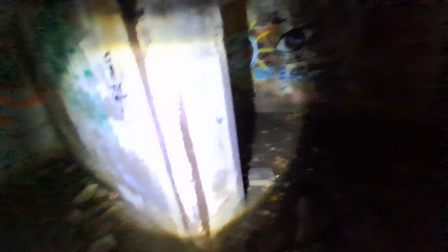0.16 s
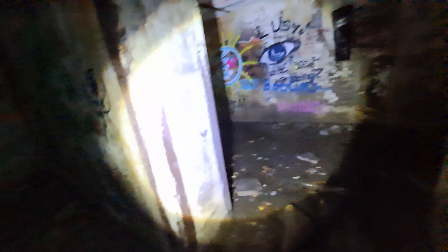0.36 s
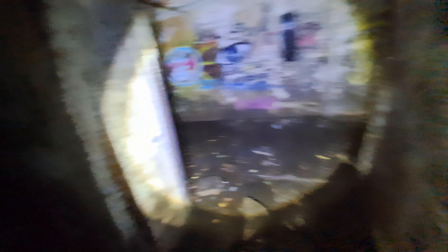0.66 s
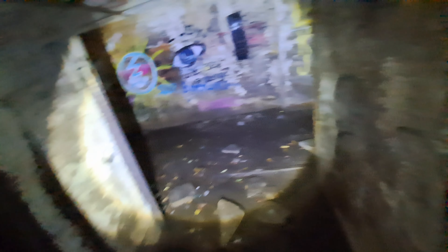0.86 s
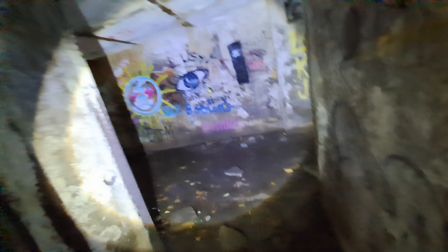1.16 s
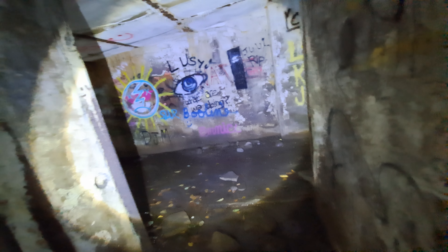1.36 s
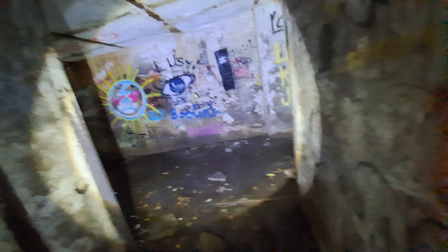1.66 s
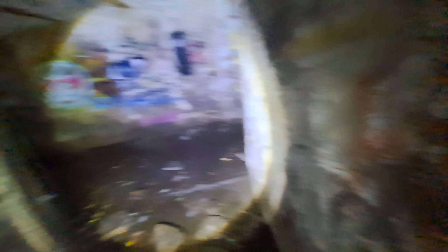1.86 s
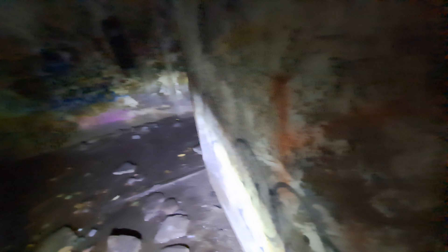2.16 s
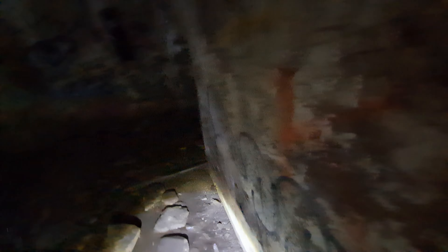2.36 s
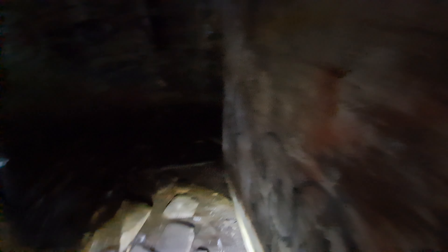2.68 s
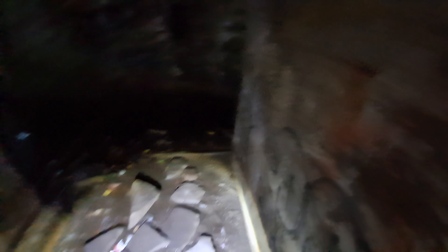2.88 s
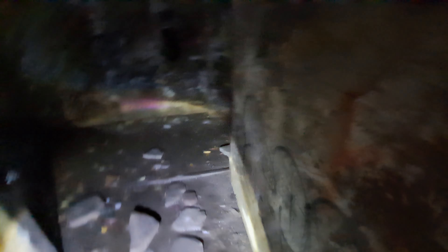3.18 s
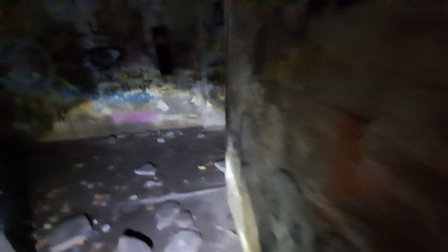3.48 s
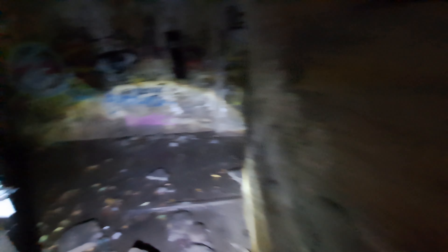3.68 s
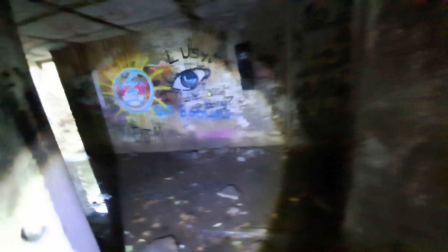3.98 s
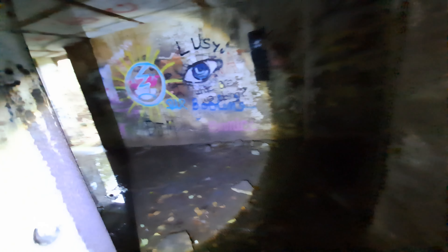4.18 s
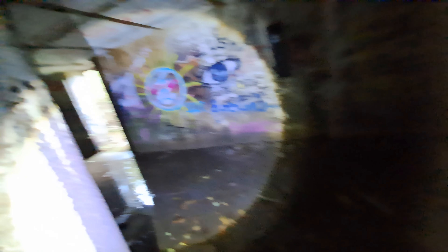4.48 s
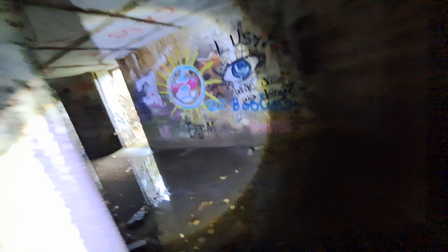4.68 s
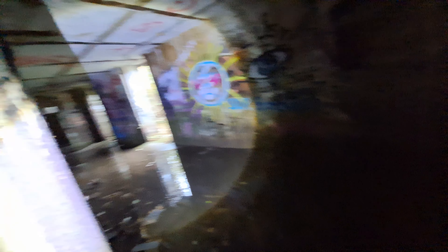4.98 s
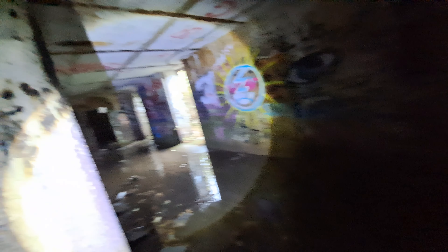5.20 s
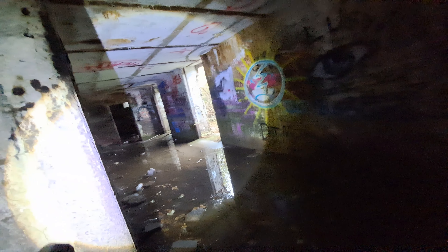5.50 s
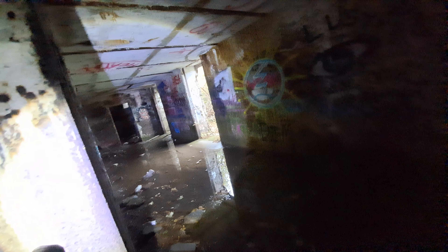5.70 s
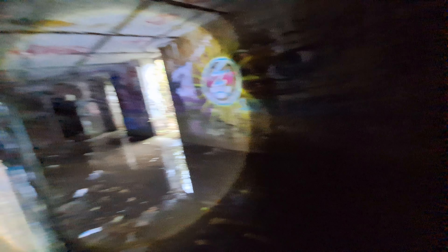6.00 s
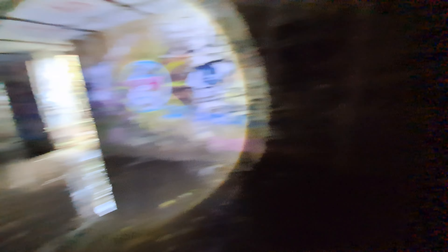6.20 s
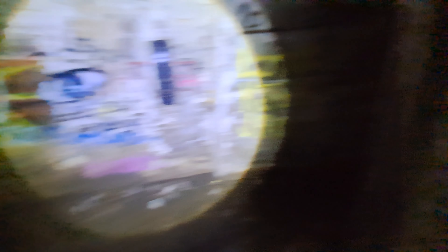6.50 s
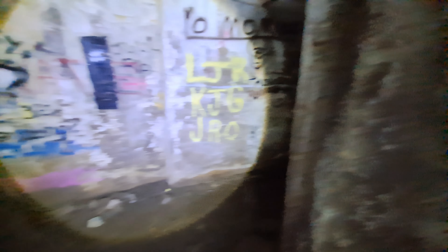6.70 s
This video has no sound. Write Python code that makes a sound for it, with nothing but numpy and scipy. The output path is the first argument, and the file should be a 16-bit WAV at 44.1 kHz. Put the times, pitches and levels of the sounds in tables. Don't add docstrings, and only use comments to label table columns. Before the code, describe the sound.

Close, irregular footsteps on broken concrete: dry grit snaps, soft cloth rustle and sole scrapes, then a busy cluster of knocking rubble, a rocking slab with a plate-like ring and a small bright clink. It calms to crushed crumbs and a final crisp step. The bare hall answers with a short echo over a very quiet low drone; stereo, with brighter sound on the right.

```python
import sys
import numpy as np
from scipy import signal
from scipy.fft import rfft, irfft, next_fast_len
from scipy.io import wavfile
from scipy.ndimage import uniform_filter1d, map_coordinates

SR = 44100
rng = np.random.default_rng(int(sys.argv[2]) if len(sys.argv) > 2 else 0)


def undo_db(level):
    steps = np.asarray(level, float) / 20
    return 10 ** steps


def dump(signal):
    limited = np.clip(np.atleast_2d(signal).T, -1, 1)
    pcm = np.round(limited * 32767).astype(np.int16)
    wavfile.write(sys.argv[1], SR, pcm)


N = 302085


def unit(x):
    return x / np.sqrt(np.mean(x ** 2) + 1e-20)


def along(points, hz):
    f, v = np.transpose(points)
    return np.interp(np.log(hz + 1), np.log(f + 1), v)


def curves(rows):
    s, *cols = np.transpose(rows)
    return [np.interp(np.arange(N) / SR, s, c) for c in cols]


def wobble(rate):
    knots = rng.standard_normal(int(N * rate / SR) + 4)
    return map_coordinates(knots, [np.arange(N) * rate / SR])


def filtered(x, response):
    m = next_fast_len(x.shape[-1] + 8192)
    spectrum = rfft(x, m) * response(np.fft.rfftfreq(m, 1 / SR))
    return irfft(spectrum, m)[..., :x.shape[-1]]


def modes(rows, f):
    total = 0
    for k, (pitch_hz, width_hz, db) in enumerate(rows):
        loss = 1j * f * abs(width_hz)
        total = total + (-1) ** k * undo_db(db) * loss / (pitch_hz * pitch_hz - f * f + loss + 1)
    return total


# pitch_hz, likeness (1 = same, 0 = unrelated)
LIKENESS = [(60, 0.91), (200, 0.88), (400, 0.81), (650, 0.5), (1650, -0.12), (4970, -0.18), (15000, 0.0034)]


def diffuse(pair):
    def mid_and_side(hz):
        turn = np.arccos(np.clip(along(LIKENESS, hz), -1, 1)) / 2
        return np.array([np.cos(turn), np.sin(turn)])
    mid, side = filtered(pair, mid_and_side)
    return np.array([mid + side, mid - side])


def rush(spectrum, patchy_db):
    z = signal.stft(rng.standard_normal((2, N)), nperseg=512)[2]
    field = uniform_filter1d(rng.standard_normal(z.shape[1:]), size=6, axis=0)
    field = uniform_filter1d(field, size=10, axis=1)
    pair = signal.istft(z * undo_db(patchy_db * unit(field)), nperseg=512)[1][:, :N]
    return unit(filtered(diffuse(pair), lambda hz: undo_db(along(spectrum, hz))))


# pitch_hz, time_to_fall_60_db_s
HALL_DECAY = [(150, 0.29), (400, 0.65), (2000, 0.54), (5000, 0.39), (12000, 0.18)]


def hall(size, shorter, build_s):
    hz, t, z = signal.stft(diffuse(rng.standard_normal((2, size))), SR, nperseg=256)
    decay = undo_db(-60 * t / (shorter * along(HALL_DECAY, hz)[:, None]))
    tail = signal.istft(z * decay, SR, nperseg=256)[1][:, :size]
    tail = tail * (1 - np.exp(-np.arange(size) / SR / build_s))
    return tail / np.linalg.norm(tail[1])


def in_hall(dry, wet_db, shorter, build_s):
    tail = hall(SR // 2, shorter, build_s)
    return dry + undo_db(wet_db) * signal.fftconvolve(dry, tail, axes=1)[:, :N]


def add(track, s, sound):
    start = round(s * SR)
    track[:, start:start + sound.shape[1]] += sound


# time_s, level_db, pitch_ratio
DRONE_DRIFT = [
    (0, -62, .86),
    (1.8, -64.5, .88),
    (2.6, -58.5, .86),
    (3.8, -56, .88),
    (5.0, -53, 1.02),
    (5.5, -59.5, .97),
    (6.85, -58.5, 1.02),
]
# pitch_hz, level_db
DRONE_COLOUR = [(25, -40), (34, -16), (42, -9), (51, -4), (59, 1), (67, -4), (80, -13), (95, -15),
                (130, -40)]


def drone():
    level_db, ratio = curves(DRONE_DRIFT)
    read = np.cumsum(ratio) * (N - 1) / ratio.sum()
    steady = rush(DRONE_COLOUR, patchy_db=.8)
    drifting = np.array([np.interp(read, np.arange(N), side) for side in steady])
    return undo_db(level_db + 1.5 * wobble(5)) * drifting


# full_speed_s, level_db, length_s, sole_over_cloth_db
LEG_STROKES = [(0.384, -55, 0.52, 0.5), (0.97, -61.5, 0.26, 3), (1.37, -61, 0.73, 1),
               (2.073, -67.5, 0.31, 0.5), (2.61, -65, 1, 0), (3.016, -62.5, 0.54, 2.5),
               (3.4, -53.5, 0.52, -1.5), (3.636, -52, 0.31, 1.5), (3.982, -52, 0.34, 1.5),
               (4.158, -41, 0.18, 1.5), (4.32, -51, 0.28, 2), (4.66, -55, 0.4, 0), (4.915, -52, 0.17, -1),
               (5.075, -53.5, 0.6, -3.5), (5.517, -58.5, 0.21, 3), (5.643, -56.5, 0.56, -2.5),
               (6.192, -59, 0.1, -9), (6.39, -61, 0.66, -15), (6.647, -64.5, 0.9, 6.5)]


def movement():
    drop_db, rise_share = 10, 0.55
    t, cloth, sole = np.arange(N) / SR, undo_db(-96), undo_db(-86)
    for s, db, length, sole_db in LEG_STROKES:
        before, after = (s - t) / rise_share, (t - s) / (1 - rise_share)
        away = np.where(t < s, before, after) / abs(length)
        stroke = undo_db(db - drop_db * away)
        cloth, sole = np.hypot(cloth, stroke), np.hypot(sole, undo_db(sole_db) * stroke)
    return 20 * np.log10(cloth), 20 * np.log10(sole)


# time_s, level_db
RUMBLE_LEVEL = [
    (0, -65.5),
    (.8, -66.5),
    (1.3, -62),
    (3.9, -59.5),
    (5.0, -59),
    (5.5, -66),
    (6.3, -68.5),
    (6.85, -62.5),
]
# pitch_hz, level_db
RUMBLE_COLOUR = [(70, 1), (105, 1.5), (150, 6), (200, 3.5), (270, -3), (340, -8), (500, -55)]
AIR_COLOUR = [(250, 5), (400, 0), (560, -3), (800, -1), (1200, 0.5), (1700, -5), (2500, -47)]


def building_air():
    (rumble_db,) = curves(RUMBLE_LEVEL)
    lag_s = 0.35
    stir_db = uniform_filter1d(movement()[1], size=int(lag_s * SR))
    air_db = -62.5 + .5 * (stir_db - stir_db.mean()) + 0.44 * (rumble_db - rumble_db.mean())
    rumble = undo_db(rumble_db + 1.5) * rush(RUMBLE_COLOUR, patchy_db=1.2)
    return rumble + undo_db(air_db + 1.5) * rush(AIR_COLOUR, patchy_db=1.1)


# pitch_hz, level_db
SCRAPE_COLOUR = [(900, -25.5), (1500, -3), (2100, 1.5), (3000, -2.5), (3800, -7.5), (5500, -52)]
RUSTLE_COLOUR = [(2500, -27), (3700, -1.5), (5000, 1), (6500, -1), (7800, -5), (8800, -23), (10500, -50)]
FIZZ_COLOUR = [(8500, -38), (9700, -13), (10400, -12), (11500, -1), (13000, 3), (14500, -1.5),
               (15700, -5.5)]


def scuffs():
    rustle_db, scrape_db = movement()
    knee_db = -55
    fizz_db = rustle_db - 1.5 - 0.6 * np.maximum(knee_db - rustle_db, 0)
    grain = 1.84 * wobble(30) + 1.2 * wobble(300)
    side_db = np.array([[-4], [.3]])
    scrape = undo_db(scrape_db + 0.62 * grain + side_db) * rush(SCRAPE_COLOUR, patchy_db=1.5)
    rustle = undo_db(rustle_db + .9 * grain) * rush(RUSTLE_COLOUR, patchy_db=1.2)
    fizz = undo_db(fizz_db + .6 * grain) * rush(FIZZ_COLOUR, patchy_db=.3)
    return scrape + rustle + fizz


# start_s, peak_db, time_to_fall_60_db_s
CLOTH_BRUSHES = [
    (1.2486, -59.5, 0.96),
    (2.4294, -67, 0.5),
    (2.6544, -60, 0.61),
    (2.8844, -61, 0.92),
    (3.3204, -50, 0.33),
    (3.7853, -53, 0.94),
    (4.2592, -39.5, 0.38),
    (5.121, -40, 0.39),
    (5.3562, -64, 0.71),
]


def brushes():
    t, level = np.arange(N) / SR, 0
    for s, db, t60 in CLOTH_BRUSHES:
        onset = np.clip((t - s) / 0.0069, 0, 1)
        level = level + undo_db(db - 3.0 - 60 * abs(t - s) / t60) * onset
    return level * (rush(FIZZ_COLOUR, patchy_db=.4) + undo_db(-7) * rush(RUSTLE_COLOUR, patchy_db=.6))


def skid():
    start_s, long_s, pitch_hz, rise_ratio = 4.235, .05, 600, 2.2
    u = np.clip((np.arange(N) / SR - start_s) / long_s, 0, 1)
    chirp = np.sin(2 * np.pi * np.cumsum(pitch_hz * rise_ratio ** u) / SR)
    tone = chirp * np.sin(np.pi * u) * undo_db(-50) * (1 + 1.5 * wobble(500))
    return in_hall(tone[None], wet_db=-3.0, shorter=0.69, build_s=0.0021)


def grind(rows, ring, density, wet_db):
    s, db = np.transpose(rows)
    level = undo_db(np.interp(np.arange(N) / SR, s, db, left=-120, right=-120))
    slips = (rng.random((2, N)) < density) * rng.standard_normal((2, N)) * undo_db(5 * wobble(40))
    steep = lambda f: modes(ring, f) * modes([(ring[0][0], 1500, 0)], f)
    return in_hall(level * unit(filtered(slips, steep)), wet_db, shorter=0.99, build_s=0.0019)


# time_s, level_db
DRAG_LEVEL = [
    (2.75, -78),
    (3.1, -68),
    (3.35, -59),
    (3.53, -58),
    (3.62, -64),
    (3.75, -66),
    (3.79, -53),
    (3.92, -53),
    (3.96, -51),
    (4.1, -58),
]


def slab_drag():
    return grind(DRAG_LEVEL, [(1960, 150, 0), (2200, 170, -2)], density=.015, wet_db=-3)


# time_s, level_db
CRUMB_LEVEL = [(5.76, -88), (5.8, -51), (5.815, -66), (5.83, -63), (5.845, -53), (5.9, -66), (6.05, -77),
               (6.13, -75), (6.15, -55), (6.185, -56), (6.21, -74)]
# time_s, level_db
PEBBLE_LEVEL = [
    (5.83, -84),
    (5.85, -67),
    (5.95, -74),
    (6.05, -84),
]


def crumbs_and_pebble():
    crumb_ring = [(4100, 500, -2), (4700, 520, -12), (2900, 900, 6), (5700, 810, -3)]
    crumbs = grind(CRUMB_LEVEL, crumb_ring, density=0.049, wet_db=-6)
    return crumbs + grind(PEBBLE_LEVEL, [(4100, 50, 0)], density=0.0074, wet_db=-1)


# time_s, level_db
TWIST_LEVEL = [
    (6.5, -78),
    (6.6, -59),
    (6.66, -51.5),
    (6.71, -76),
]


def sole_twist():
    ring = [(3060, 910, -2), (1820, 290, 5.5), (4430, 910, -0.5)]
    return grind(TWIST_LEVEL, ring, density=0.035, wet_db=-2.5)


# pitch_hz, level_db
CRUNCH_COLOUR = [(700, -33), (1500, -5.5), (2500, -3), (5000, -0.5), (7500, 1.5), (9200, -16),
                 (10500, -9.5), (12500, -1.5), (15700, -13)]


def knocks(events, ring, low, direct_db, level_db, thud_gain_db, shorter):
    out, size = np.zeros((2, N + SR)), SR
    t = np.arange(size) / SR
    for s, db, thud_db, body_db, ring_db in events:
        blow = diffuse(rng.standard_normal((2, size))) * undo_db(-60 * t / 0.057) * (1 - np.exp(-t / 0.0001))
        wave = undo_db(direct_db) * blow / np.linalg.norm(blow[1]) + hall(size, shorter, build_s=0.003)
        lasting = wave + undo_db(-1.5) * hall(size, 1.63 * shorter, build_s=0.0026)
        crunch = filtered(wave, lambda f: undo_db(along(CRUNCH_COLOUR, f)))
        top = crunch + undo_db(ring_db) * filtered(lasting, lambda f: modes(ring, f))
        body = filtered(wave, lambda f: modes([(775, 2200, 0)], f) ** 2)
        thud = filtered(lasting, lambda f: modes(low, f) * modes([(304, 2400, 0)], f))
        top, body, thud = [p / np.linalg.norm(p, axis=1)[:, None] for p in (top, body, thud)]
        mix = top + undo_db(body_db - 4.5) * body + undo_db(thud_db + thud_gain_db) * thud
        add(out, s, undo_db(db + level_db) * mix)
    return out[:, :N]


# pitch_hz, width_hz, level_db
RUBBLE_KNOCKS = [
    (2.4312, -56, -14, -24, -25),
    (2.929, -51.5, -15, -8, 9),
    (3.4174, -49.5, 9, -30, -15),
    (3.5927, -39.5, -7, -11, 1),
    (3.9532, -34, -9, -21, 6.5),
    (4.2589, -32.5, -18, -25, 2),
    (4.6398, -41, -3, -2, 3),
    (4.744, -37, -14, -4, -36),
    (4.7799, -46, -11, -22, -26),
    (5.1186, -50, -10, -16, -10),
]
RUBBLE_RING = [(2160, 980, -0.5), (3150, 360, -12), (5750, 880, -34), (7500, 1200, -14)]
FLOOR_THUD = [(166, 112, 1.5), (337, 106, 4)]


def rubble():
    return knocks(RUBBLE_KNOCKS, RUBBLE_RING, FLOOR_THUD, direct_db=-6.5, level_db=27.0,
                  thud_gain_db=-2.0, shorter=1.0)


LUMP_KNOCKS = [
    (3.173, -30, -39, -50, 3.4),
    (3.177, -28.5, -34, -48, 5),
    (3.195, -37.5, -30, -50, 5),
    (3.245, -42, -30, -50, 6),
]
LUMP_RING = [(2330, 1320, 10), (3260, 860, 16.4), (4100, 540, 11), (4900, 470, 14.6), (7300, 170, 0.71)]


def lump():
    return knocks(LUMP_KNOCKS, LUMP_RING, FLOOR_THUD, direct_db=-7.0, level_db=25.0,
                  thud_gain_db=4.0, shorter=1.0)


HEEL_KNOCK = [
    (5.657, -55, 4, 16, -6),
]


def heel():
    return knocks(HEEL_KNOCK, RUBBLE_RING, FLOOR_THUD, direct_db=0, level_db=21, thud_gain_db=0, shorter=.35)


SLAB_KNOCKS = [
    (4.031, -39.5, 1, -17, 7.6),
    (4.0766, -40, -36, -21, 4.6),
    (4.1195, -34, -20, -23, 13),
    (4.1235, -18.5, -10.5, -16.5, 28),
    (4.1899, -37, -26, -40, 30),
]
SLAB_RING = [(1550, 90, -13), (1680, 60, -13), (1930, 50, -15), (2065, 50, -1), (2122, 45, 4),
             (2180, 50, 0), (4960, 280, -8), (5490, 90, -13), (7100, 250, -20)]
SLAB_GAP = [(216, 25, -10.5), (351.5, 20.2, 5.5), (395, 33, -6), (432, 23, -4)]


def slab():
    return knocks(SLAB_KNOCKS, SLAB_RING, SLAB_GAP, direct_db=2.5, level_db=24, thud_gain_db=5.0, shorter=1.09)


SETTLE_KNOCKS = [
    (4.2146, -39, -8, -31, 22),
    (4.262, -32, -15, -10, 19),
    (4.3, -32.5, -7, -22, 18),
    (4.3785, -45.5, 2.5, -10, 22),
]
SETTLED_RING = [(1650, 72, -9), (2046, 80, 4), (2230, 91, -3), (3950, 350, -5.5), (4950, 300, -8.5),
                (7160, 300, -10)]
SETTLED_GAP = [(215, 36, -12), (345.5, 18.5, 3), (393, 75, -9)]


def slab_settles():
    return knocks(SETTLE_KNOCKS, SETTLED_RING, SETTLED_GAP, direct_db=0, level_db=24.5,
                  thud_gain_db=5.5, shorter=1.13)


SHARD_KNOCKS = [
    (4.8884, -36.5, -14, -28, 5.3),
    (4.8945, -27, -24.5, -13, 30),
    (4.9234, -38.5, -13.5, -5, 13),
    (4.961, -24.5, -27.5, -15, 23),
    (4.967, -38, -16, -27, 7.6),
]
SHARD_RING = [(2530, 70, -12), (2790, 75, 1.5), (4150, 120, -13), (5000, 120, -4), (5160, 150, -9),
              (7550, 150, -13)]


def shard():
    return knocks(SHARD_KNOCKS, SHARD_RING, FLOOR_THUD, direct_db=8.0, level_db=20.5,
                  thud_gain_db=10.5, shorter=1.28)


WALL_ANSWER = [1, -2.5, -9, -12]


def grit(events, chips, shorter, left_db, middle_db, edge=8, crack_s=.0045):
    out, size = np.zeros((2, N + SR)), SR // 5
    t = np.arange(size) / SR
    lead = 14
    for s, level_db, tilt_db, fizz_db in events:
        levels = level_db + np.array([-tilt_db / 2, middle_db, tilt_db / 2, fizz_db])
        pan_db = rng.normal(0, 2)
        crack = rng.standard_normal((2, size)) * undo_db(-60 * t / crack_s)
        crack[:, 0] += edge
        crumbs = (rng.random(size) < .003) * rng.standard_normal(size) * undo_db(-12 - 60 * t / .15)
        late = np.linalg.norm(crack[1]) * (crumbs + .5 * hall(size, shorter, build_s=.003))
        late[1], crack[1] = np.roll(late[1], lead), np.roll(crack[1], lead)
        side_db = np.array([[pan_db + left_db], [0]])
        for db, group, walls_db in zip(levels, chips, WALL_ANSWER):
            group = [(hz * rng.normal(1, .02), w, g + rng.normal(0, 2)) for hz, w, g in group]
            steep = lambda f: modes(group, f) * modes([(group[0][0], .9 * group[0][0], 0)], f)
            near, far = filtered(np.array([crack, late]), steep)
            snap = (near + undo_db(walls_db) * far) / np.linalg.norm(near[1])
            add(out, s - lead / SR, undo_db(db + 15.5 + side_db) * snap)
    return out[:, :N]


# pitch_hz, width_hz, level_db
CHIP_RING = [
    [(2886, 380, 0)],
    [(3880, 510, -3), (4960, 890, -0.5)],
    [(5970, 410, -3.5), (6520, 300, 0.5), (7770, 480, -2.5)],
    [(11450, 4600, 1.5), (14600, 2300, 5.5)],
]
# start_s, level_db, high_over_low_chips_db, fizz_over_level_db
DRY_TICKS = [(.551, -66, 6, 10), (3.316, -66, 6, 16), (3.397, -60, 6, 12), (3.419, -58, 0, 8),
             (3.5, -65, 4, 9), (3.532, -52, -6, 1), (3.594, -46, -12, 4), (3.604, -49, -7, 5),
             (3.954, -43, -8, -12), (4.077, -40, -4, -1), (4.64, -45, 4, -3), (4.747, -43.5, 14, -6),
             (4.925, -43, 6, -6), (5.04, -57, 6, 13), (5.126, -60, 4, 27), (5.889, -70, 8, 9)]


def ticks():
    return grit(DRY_TICKS, CHIP_RING, shorter=0.6, left_db=6, middle_db=4, edge=2.6, crack_s=.008)


# pitch_hz, width_hz, level_db
CHIP_RING_ASIDE = [
    [(2900, 1200, 0)],
    [(4120, 260, 0.5), (4650, 420, -2)],
    [(5600, 500, 1), (6530, 2800, -12), (7300, 600, -2)],
    [(11900, 2200, -19), (14300, 1400, -20)],
]
SNAPS_ASIDE = [(5.3603, -58, 10, 3), (5.3968, -56, 8, -15), (5.4156, -51, 4, -5), (5.4372, -45, 5, -10),
               (5.6266, -43.5, 2, 1), (5.6338, -49.5, -18, -8), (5.7744, -61.5, -31, -26),
               (5.7857, -46.5, -9, -1), (5.8039, -37, 8, -20), (5.8085, -39.5, -2, -4),
               (5.8346, -36, 11, -13), (5.8414, -41, 10, -20), (5.8483, -49, -13, -24),
               (6.1359, -60, -1, -9), (6.1667, -55, 4, -11), (6.1831, -43, 7, -12), (6.1985, -62, 7, -6)]


def grit_aside():
    return grit(SNAPS_ASIDE, CHIP_RING_ASIDE, shorter=0.52, left_db=5.5, middle_db=6.0,
                edge=3.5, crack_s=0.016)


SNAPS_UNDERFOOT = [(.0969, -51, 10, -3), (.1072, -66.5, -9, -20), (.1595, -56, 12, -24),
                   (.3321, -46, 6, 4), (.5289, -50.5, -20, -5), (.6494, -51.5, 0, -5),
                   (.6828, -73, 7, 12), (.7376, -72, 16, 13), (.7435, -73, -6, 12),
                   (.8039, -59, -16, -14), (.8123, -39.5, -4, -22), (.825, -32.5, -5, 2),
                   (.8272, -28.5, 14, -4), (.8415, -36, 24, -22), (.8612, -34, 3, -18),
                   (.8922, -46.5, 4, -3), (.9681, -50, 9, -30), (.9764, -42, 9, -9),
                   (1.0237, -49, 3, -14), (1.1449, -45, 3, -24), (1.1543, -48, 3, -11),
                   (1.1588, -44.5, 4, -5),
                   (1.4393, -40, -2, -20), (1.4437, -34, 2, -21), (1.627, -61, 3, 0), (1.6315, -67, 9, 18),
               (1.662, -55, -8, -4), (1.8398, -54, -2, -29), (1.8484, -55.5, -5, -19),
               (1.8897, -49, 3, -21), (1.901, -51, 0, -9), (1.911, -49.5, -1, -17), (1.949, -44.5, -1, -14),
               (1.975, -56, 4, -2), (2.101, -49, -1, -13), (2.1086, -42, 5, -6), (2.3433, -62.5, -17, -24),
               (3.483, -47.5, 5, -21), (3.5098, -50, 13, 3),
                   (6.4218, -50.5, 16, 3), (6.7643, -48, -10, -24), (6.7723, -44, -2, -16),
                   (6.778, -51, -10, -17), (6.797, -55, 8, -16), (6.8027, -25, -1, -2),
                   (6.8095, -43, 15, -17), (6.8147, -51, 3, -9), (6.8221, -27, -2, -20),
                   (6.8275, -55, -14, -24), (6.831, -42, 6, -18), (6.8366, -52, -5, -16)]


def grit_underfoot():
    snaps = SNAPS_UNDERFOOT
    return grit(snaps, CHIP_RING, shorter=0.62, left_db=-1.5, middle_db=2.5)


def scene():
    background = drone() + building_air()
    walker = scuffs() + brushes()
    dragged = skid() + slab_drag() + crumbs_and_pebble() + sole_twist()
    knocking = rubble() + lump() + heel() + slab() + slab_settles() + shard()
    return background + walker + dragged + knocking + ticks() + grit_aside() + grit_underfoot()


def roll_off(x):
    return signal.sosfilt(signal.butter(12, 16820, fs=SR, output="sos"), x)


# pitch_hz, left_minus_right_db
LEFT_COLOUR = [(300, -1.5), (600, -1.5), (1200, -9.5), (1800, -11.5), (2800, -13), (4200, -14.5),
               (6500, -21), (8200, -3.5), (9500, -34), (10800, -0.5), (12500, -10), (15500, -9)]
# pitch_hz, level_db
PORT_COLOUR = [(300, 1.5), (700, 6), (1500, 3.5)]


def record(dry):
    def ports(hz):
        colour = undo_db(along(PORT_COLOUR, hz) + [along(LEFT_COLOUR, hz), 0 * hz])
        return colour * np.where(hz < 15850, 1, undo_db(-26)) * (hz < 16600)
    return roll_off(filtered(dry, ports))


dry = scene()
out = record(dry)
dump(out)
```